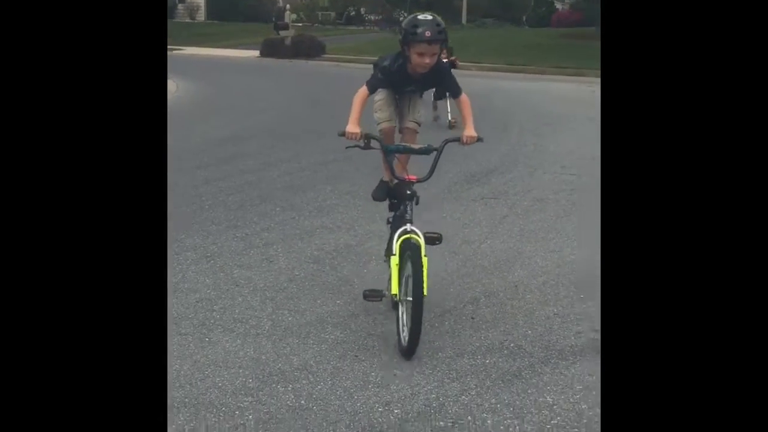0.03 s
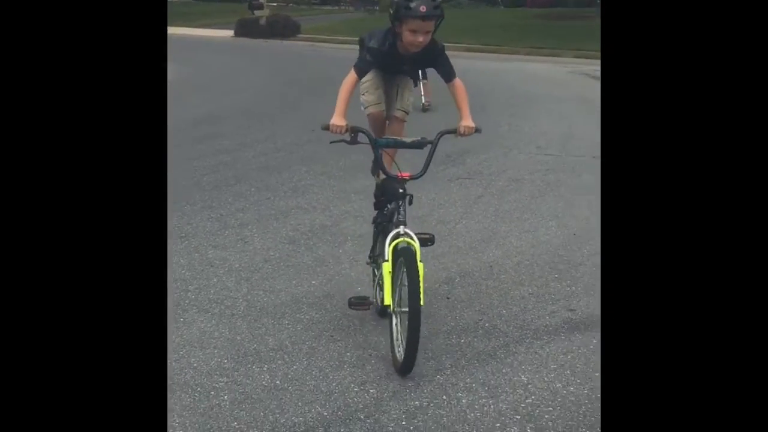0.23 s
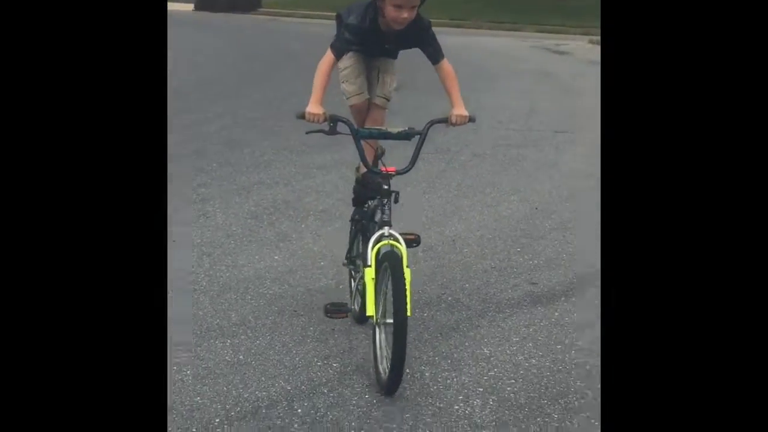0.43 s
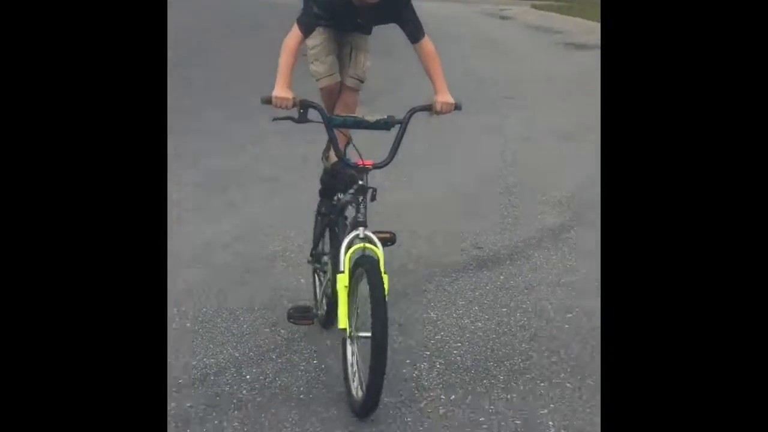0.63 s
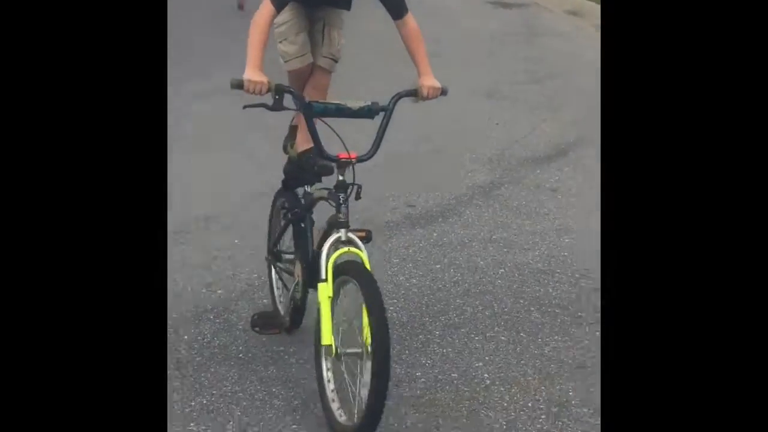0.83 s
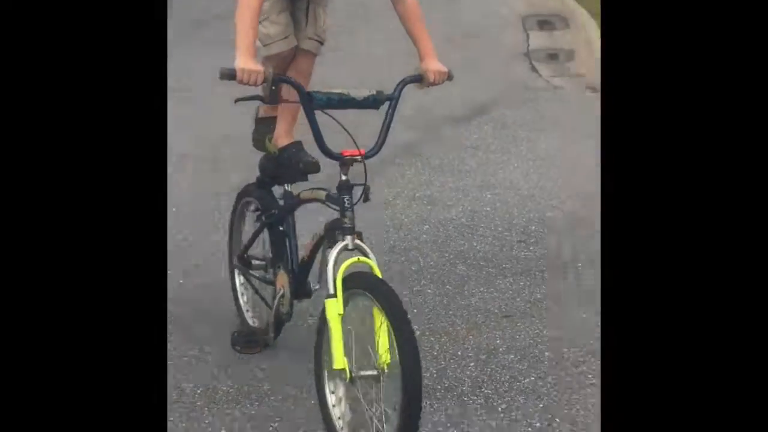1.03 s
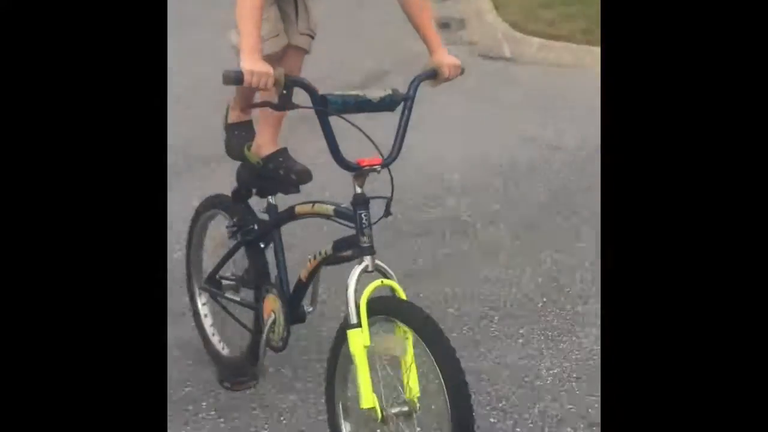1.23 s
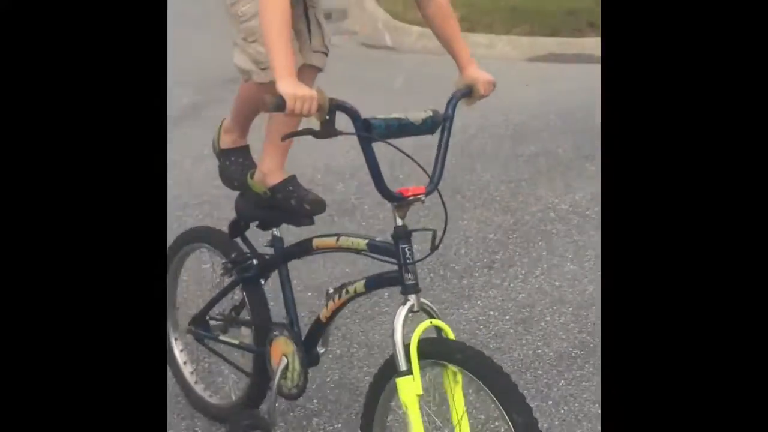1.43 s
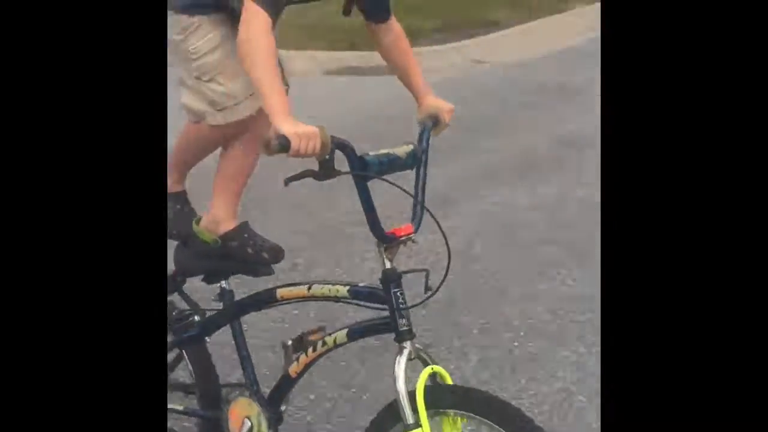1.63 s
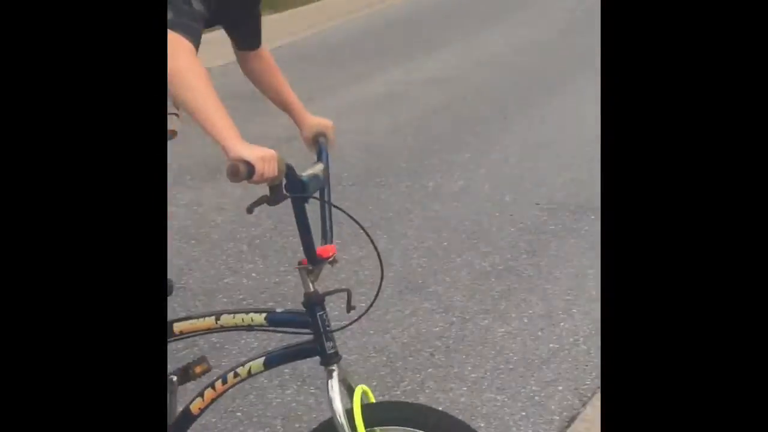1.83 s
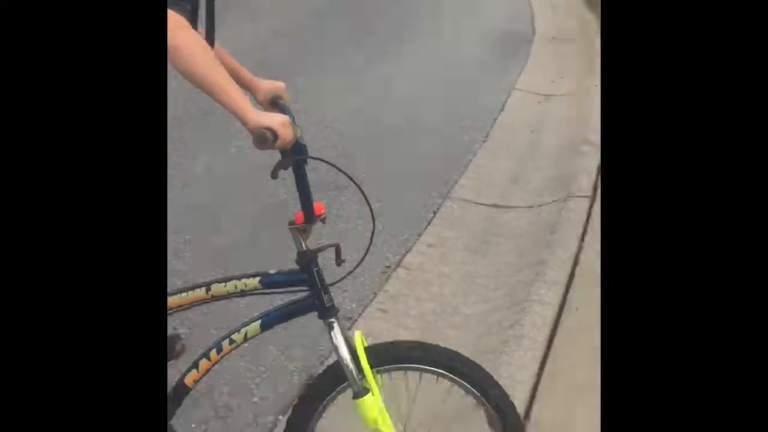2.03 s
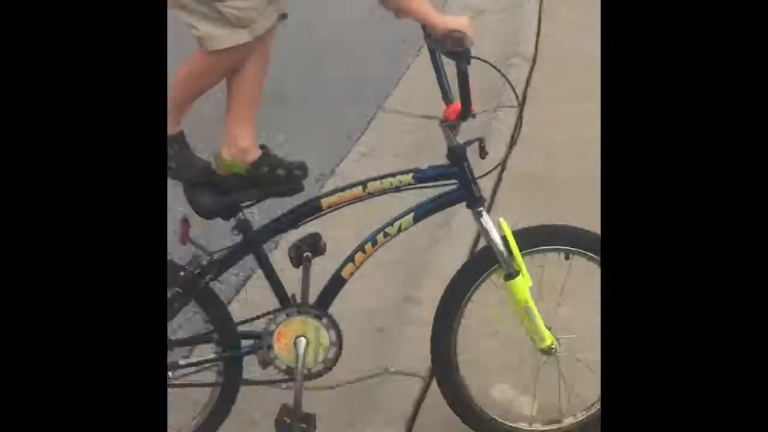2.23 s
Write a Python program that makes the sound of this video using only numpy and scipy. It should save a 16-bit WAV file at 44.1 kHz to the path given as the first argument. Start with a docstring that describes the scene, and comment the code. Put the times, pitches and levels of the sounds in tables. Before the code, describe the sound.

A small bicycle rolls up and passes close by outdoors. After a low gust of wind on the microphone come a faint thin squeak, bursts of chain clinking and one hollow knock, with tyres hissing and snapping small stones.

```python
"""Small bike coasting past

A small bike coasts toward and past the microphone on an asphalt street. The tyres hiss, drum,
scrunch on grit and snap stones aside; the slack chain and fittings rattle in bursts. Something
on the bike gives one thin squeak, later one hollow knock. Wind buffets the microphone over
a soft outdoor hush."""
import sys
import numpy as np
from scipy import signal
from scipy.fft import rfft, irfft, next_fast_len
from scipy.io import wavfile
from scipy.ndimage import uniform_filter1d

SR = 44100
rng = np.random.default_rng(int(sys.argv[2]) if len(sys.argv) > 2 else 0)


def dump_mix(stems):
    """Bounce the given channels to the path in sys.argv[1] as a 16-bit WAV at rate SR."""
    frames = np.atleast_2d(stems).T  # one column per channel
    limited = np.clip(frames, -1, 1)  # hard clip at full scale
    pcm = np.round(limited * 32767).astype(np.int16)
    wavfile.write(sys.argv[1], SR, pcm)


N = 101429
T = np.arange(N) / SR
CUTOFF_HZ = 15900

# tyres on asphalt: time_s, relative_db
ROLL_LEVEL = [(0,-59.5),(.23,-58.5),(.3,-65.5),(.68,-59),(.77,-57.5),(.95,-55.5),(1.11,-58),(1.23,-48),(1.32,-56.5),(1.5,-54.5),(1.62,-50.5),(1.70,-56),(1.80,-50.5),(1.87,-55),(2.01,-56),(2.07,-53),(2.16,-51),(2.3,-52.5)]
# tread spectrum: freq_hz, gain_db
ROLL_SPECTRUM = [(200,-7.5),(480,4),(700,8.5),(920,-8.5),(1350,0.5),(2800,-9.5),(4500,-11),(9000,-20),(10600,-21),(16000,-19.5)]
# patches of loose grit: peak_s, half_width_s, level_db
GRIT_SCRUNCHES = [(.235,0.015,-56.5),(.754,0.0092,-55),(.95,0.0036,-51.5),(1.165,0.014,-54),(.83,0.072,-64.5),(1.72,0.0093,-63),(1.756,0.014,-54),(1.813,0.0051,-54),(2.072,0.02,-48)]
# scrunch spectrum: freq_hz, gain_db
SCRUNCH_SPECTRUM = [(400,6),(1000,1.5),(2400,0),(3400,-7),(5000,-19),(9000,-26),(16000,-23)]

# chain and fitting contacts: start_s, treble_relative_db, body_relative_db, pitch_hz
CHAIN_CLINKS = [(0.902,-58,-62,6540),(1.035,-55.5,-54,8550),(1.166,-54.5,-64,8700),(1.1902,-53.5,-41,9000),(1.1993,-51,-44,6450),
                (1.203,-55,-47,8100),(1.2295,-53,-51,8950),(1.25,-58,-37,9100),(1.267,-46.5,-43,8500),(1.275,-60,-45.5,8500),
                (1.2827,-53,-46,9060),(1.4124,-52,-57,8700),(1.517,-60,-65,9000),(1.593,-53,-53,6200),(1.602,-53,-46.5,8200),
                (1.6738,-55.5,-52,8400),(1.681,-52,-48,8000),(1.687,-51,-45,11900),(1.715,-55,-44,5460),(1.744,-51,-61,9900),
                (1.7515,-46.5,-61,5980),(1.756,-46.5,-39.5,9200),(1.7622,-51,-50,9100),(1.9069,-46.5,-74,10400),(1.913,-53.5,-71,11140),
                (1.921,-54.5,-80,10500),(2.027,-52,-73,4930),(2.133,-44,-58,13700),(2.1388,-43.5,-57,10100),(2.1457,-51,-49,12400),
                (2.1986,-45,-45,4760),(2.2108,-45,-41,6430),(2.2176,-44,-40,10200),(2.226,-44.5,-55,4310),(2.232,-51,-50,9200),
                (2.2388,-40,-46,7100),(2.2659,-49,-58,5900)]
# bursts of small chain contacts: peak_s, half_width_s, relative_db
CHAIN_SHIVERS = [(.125,0.0075,-66),(.4,.008,-68),(.45,0.0083,-68),(.905,0.036,-64),(1.24,0.057,-62.5),(1.405,0.0089,-63.5),(1.68,0.038,-57),(1.757,0.018,-62),(1.92,0.031,-69),(2.12,0.093,-62.5),(2.232,.022,-58.5)]
# modes of the whole chain: freq_hz, width_hz, gain_db
CHAIN_RESONANCES = [(6400,350,-8),(8400,220,-6),(9100,170,-6),(13200,400,-8)]
# bright crack of a contact: freq_hz, gain_db
CRACK_SPECTRUM = [(1500,2),(4500,-2.5),(6500,-2),(9400,-1.5),(10500,-4.5),(12500,-1),(16000,0.5)]
# dull body of a contact: freq_hz, gain_db
BODY_SPECTRUM = [(500,-28),(1300,-2.5),(2400,7.5),(3300,2.5),(4500,-10),(6500,-14),(16000,-22)]

# stones snapping from under a tyre: start_s, relative_db, lowpass_hz
STONE_SNAPS = [(.888,-37,6000),(1.2592,-31,3000),(1.695,-32,6500),(1.7025,-41,11000),(1.8134,-28,4200),(2.2125,-23,3400)]
# snap spectrum: freq_hz, gain_db
SNAP_SPECTRUM = [(500,1),(1200,5),(2300,8),(4500,6),(8000,5),(16000,-1)]
# pebbles popping under the tread, plus one low tock at 1.599 s: start_s, relative_db, pitch_hz
PEBBLE_POPS = [(0.595,-51,2285),(0.755,-54,2380),(.949,-52.5,3580),(1.2294,-39.5,1370),(1.599,-53,630),(1.718,-41.5,1620),(1.955,-49,1860),(2.2125,-44,2160),(2.228,-43,4130),(2.24,-42,2030)]

# blows behind the knock: start_s, level_db
KNOCK_BLOWS = [(1.541,-37)]
# hollow modes: freq_hz, width_hz, gain_db
HOLLOW_MODES = [(1010,79,1),(1158,49,-1.5),(1350,100,-4),(1550,73,-6),(1920,130,-11)]
# squeak contour: time_s, pitch_hz, relative_db, warble_depth_hz
SQUEAK_CONTOUR = [(0.744,7050,-66,450),(.768,7330,-64.5,450),(0.786,8300,-60.5,80),(0.812,8300,-61,130),(.829,7470,-62,750),(0.836,6680,-60.5,80),(0.865,6770,-62.5,130),(0.876,5340,-60,200)]

# gusts on the microphone: time_s, relative_db
GUST_LEVEL = [(0.0,-43),(0.06,-53),(0.15,-35.5),(0.18,-44.5),(0.22,-32),(0.26,-40),(.35,-32),(0.49,-22.5),(0.67,-32),(0.7,-43),(0.86,-35.5),(0.91,-45.5),(0.94,-35.5),(0.98,-48.5),(1.29,-49.5),(1.32,-39),(1.36,-49.5),(1.53,-47.5),(1.6,-36.5),(1.66,-45),(1.72,-46.5),(1.8,-38),(1.86,-40.5),(1.94,-46.5),(2.02,-39),(2.05,-48.5),(2.18,-41.5),(2.24,-52),(2.28,-40.5)]
# short thumps of wind: peak_s, half_width_s, level_db
WIND_BUFFETS = [(1.571,0.011,-34.5),(1.62,0.0048,-22.5),(1.749,0.0057,-27),(1.82,0.008,-28)]
# eddy spectrum: freq_hz, gain_db
EDDY_SPECTRUM = [(20,-36),(30,-28),(40,-7),(65,1),(100,-3),(160,-11.5),(230,-27.5),(320,-46),(480,-72),(1000,-101)]
# finer eddies in the strongest gust: time_s, level_db
FLUTTER_LEVEL = [(.3,-67),(.44,-46),(.47,-31.5),(.55,-38),(.64,-40.5),(.72,-70),(.9,-100)]
# fine eddy spectrum: freq_hz, gain_db
FLUTTER_SPECTRUM = [(110,-10),(190,5),(270,-1.5),(350,-11.5),(430,-21),(600,-37.5),(1200,-91)]

# outdoor hush: time_s, level_db
HUSH_LEVEL = [(0,-53),(.06,-52.5),(.15,-56),(.24,-53.5),(.33,-52.5),(.7,-56.5),(1.0,-53),(1.15,-56.5),(2.3,-54.5)]
# hush spectrum: freq_hz, gain_db
HUSH_SPECTRUM = [(40,13.5),(100,1.5),(205,4.5),(300,5.5),(450,-13.5),(730,-2),(1300,-7),(2600,-22),(5000,-28.5),(9000,-29),(11000,-33),(16000,-38)]


def tyres():
    """Tread hiss and fine grit, small stones ringing at their own pitches, and short scrunches."""
    level_db, = curves(ROLL_LEVEL)
    hiss = from_db(-6.5) * rng.standard_normal(N)
    grit = from_db(-10.5) * grains(per_s=600, spread_db=8)
    roll = colour((hiss + grit) * from_db(level_db + 1.3 * drift(60)), ROLL_SPECTRUM)
    crunch, ring_cycles = 0, 11
    for hz in np.geomspace(620, 3200, num=36):
        ring = resonate(grains(per_s=30, spread_db=3.9), hz, hz / (np.pi * ring_cycles))
        crunch += rms_one(ring) * (hz / 1000) ** -.3
    scrunch = colour(grains(per_s=4000, spread_db=.46) * swells(GRIT_SCRUNCHES), SCRUNCH_SPECTRUM)
    return roll + from_db(level_db - 6.5) * rms_one(crunch) + scrunch


def drumming():
    """Rough asphalt makes the tyres drum, louder as they roll nearer."""
    pitch_hz, width_hz = 185.9, 60
    roll_db, = curves(ROLL_LEVEL)
    drum = resonate(rng.standard_normal(N), pitch_hz, width_hz)
    drum = rms_one(resonate(drum, pitch_hz, width_hz))
    return from_db(-53 + .54 * (roll_db - roll_db.mean())) * drum


def chain():
    """Slack chain and fittings clink: a crack, a dull body, a ring. Small contacts shiver between."""
    spread_octaves, link_width_hz = .4, 200
    partial_ratios = 2 ** (spread_octaves * rng.standard_normal((len(CHAIN_CLINKS), 4)))
    treble_noise, body_noise = rng.standard_normal((2, N))
    ticks = grains(per_s=330, spread_db=3) + from_db(-7) * rng.standard_normal(N)
    shiver = swells(CHAIN_SHIVERS) * rms_one(ticks)
    cracks, bodies, rings = from_db(.5) * shiver, from_db(-3) * shiver, 0
    for (start_s, treble_db, body_db, pitch_hz), ratios in zip(CHAIN_CLINKS, partial_ratios):
        envelope = strike(start_s, attack_s=.00092, decay_s=.0029)
        contact = from_db(treble_db) * envelope * treble_noise
        cracks += from_db(-2.5) * contact
        bodies += from_db(body_db - 5.5) * envelope * body_noise
        partials = sum(metal_ring(contact, pitch_hz * ratio, link_width_hz) for ratio in ratios) / 2
        rings += from_db(-7) * metal_ring(contact, pitch_hz, link_width_hz) + from_db(-9) * partials
    chain_ring = sum(from_db(db) * metal_ring(cracks, hz, width) for hz, width, db in CHAIN_RESONANCES)
    treble = colour(cracks + from_db(-10) * chain_ring, CRACK_SPECTRUM)
    return rings + treble + colour(bodies, BODY_SPECTRUM)


def metal_ring(contact, pitch_hz, width_hz):
    """Short metallic ring; keeps the power of the contact."""
    return resonate(contact, min(pitch_hz, CUTOFF_HZ), width_hz) * np.sqrt(SR / (np.pi * width_hz))


def stones():
    """Stones snap from under a tyre with a gritty tail; pebbles pop and ring briefly."""
    snaps, pops = np.zeros((2, N))
    for start_s, db, lowpass_hz in STONE_SNAPS:
        hit = from_db(db - 7) * strike(start_s, attack_s=.00019, decay_s=.001) * rng.standard_normal(N)
        hit[int(start_s * SR)] += from_db(db + 7)  # click ahead of the tail
        snaps += signal.sosfilt(signal.butter(2, lowpass_hz, fs=SR, output="sos"), hit)
    for start_s, db, pitch_hz in PEBBLE_POPS:
        envelope = from_db(db) * strike(start_s, attack_s=.0005, decay_s=.005)
        pops += envelope * np.sin(2 * np.pi * pitch_hz * (T - start_s))
    return colour(snaps, SNAP_SPECTRUM) + pops * (.89 + .35 * drift(380))


def knock():
    """A blow rings a few short, hollow modes."""
    out = np.zeros(N)
    for start_s, level_db in KNOCK_BLOWS:
        age_s = np.maximum(T - start_s, 0)
        for k, (hz, width_hz, gain_db) in enumerate(HOLLOW_MODES):
            decay = np.exp(-np.minimum(np.pi * width_hz * age_s, 20))
            out += (-1) ** k * from_db(level_db + gain_db) * np.sin(2 * np.pi * hz * age_s) * decay
    return out


def squeak():
    """Thin rubbing tone that arches in pitch and warbles as it slides."""
    warble_hz, jitter_hz, rasp_db, fade_s = 107.3, 130, 2.6, .0019
    pitch_hz, level_db, depth_hz = curves(SQUEAK_CONTOUR)
    start_s, end_s = SQUEAK_CONTOUR[0][0], SQUEAK_CONTOUR[-1][0]
    warble = np.sin(2 * np.pi * np.cumsum(warble_hz * (1 + .11 * drift(39.4))) / SR)
    gate = np.clip(np.minimum(T - start_s, end_s - T) / fade_s, 0, 1)
    envelope = gate * from_db(level_db + 2.5 + rasp_db * drift(300))
    freq_hz = pitch_hz + depth_hz * warble + jitter_hz * drift(980)
    return envelope * np.sin(2 * np.pi * np.cumsum(freq_hz) / SR)


def wind():
    """Eddies at the microphone follow gusts and buffets; the strongest gust flutters higher."""
    gust_db, = curves(GUST_LEVEL)
    flutter_db, = curves(FLUTTER_LEVEL)
    eddies = colour(rng.standard_normal(N), EDDY_SPECTRUM)
    local_power = uniform_filter1d(np.abs(signal.hilbert(eddies)) ** 2, size=1100) / 2
    eddies /= np.sqrt(local_power + 1e-9)
    flutter = from_db(flutter_db) * colour(rng.standard_normal(N), FLUTTER_SPECTRUM)
    return (from_db(gust_db + 1) + swells(WIND_BUFFETS)) * eddies + flutter


def street():
    """Outdoor hush, gently swelling."""
    level_db, = curves(HUSH_LEVEL)
    return from_db(level_db + .5 * drift(24)) * colour(rng.standard_normal(N), HUSH_SPECTRUM)


def from_db(db):
    """Decibels to gain."""
    return 10 ** (np.asarray(db) / 20)


def rms_one(x):
    """Scale to unit rms."""
    return x / np.sqrt(np.mean(x ** 2) + 1e-20)


def curves(rows):
    """Interpolate each column linearly over time."""
    time_s, *columns = np.transpose(rows)
    return [np.interp(T, time_s, column) for column in columns]


def drift(rate_hz):
    """Low-passed random wander, rms 1."""
    freq_hz = np.arange(N // 2 + 1) * SR / N
    return rms_one(irfft(rfft(rng.standard_normal(N)) / (1 + (freq_hz / rate_hz) ** 2), N))


def colour(x, spectrum):
    """Minimum-phase filter with the given spectrum; keeps the power of white noise."""
    size = next_fast_len(N + SR // 2, real=True) // 2 * 2
    bins_hz = np.maximum(np.arange(size // 2 + 1) * SR / size, 1)
    hz, db = np.transpose(spectrum)
    gain = from_db(np.interp(np.log(bins_hz), np.log(hz), db))
    low_cut = 1 / (1 + (hz[0] / 2 / bins_hz) ** 2)
    cepstrum = irfft(np.log(rms_one(gain * low_cut)), size)
    cepstrum[1:size // 2] *= 2
    cepstrum[size // 2 + 1:] = 0
    return irfft(rfft(x, size) * np.exp(rfft(cepstrum)), size)[:N]


def resonate(x, freq_hz, width_hz):
    """Two-pole resonance, peak gain 1."""
    radius = np.exp(-np.pi * width_hz / SR)
    feedforward = np.array([1, 0, -1]) * (1 - radius ** 2) / 2
    feedback = [1, -2 * radius * np.cos(2 * np.pi * freq_hz / SR), radius ** 2]
    return signal.lfilter(feedforward, feedback, x + 1e-18)


def grains(per_s, spread_db):
    """Random clicks of uneven size, rms 1."""
    sizes = from_db(spread_db * np.minimum(rng.exponential(1, N), 3)) * rng.choice([-1, 1], N)
    return rms_one(sizes * (rng.random(N) < per_s / SR))


def swells(rows):
    """Sum of bell-shaped envelopes."""
    return sum(from_db(db) * np.exp(-.5 * ((T - peak_s) / width_s) ** 2) for peak_s, width_s, db in rows)


def strike(start_s, attack_s, decay_s):
    """Contact envelope: linear rise, exponential decay."""
    age_s = np.maximum(T - start_s, 0)
    return np.minimum(age_s / attack_s, 1) * np.exp(-np.clip((age_s - attack_s) / decay_s, 0, 20))


def scene():
    """Wind, street and the passing bike, mono."""
    return (wind() + street() + tyres() + drumming() + chain() + stones() + knock() + squeak())[None]


def record(dry):
    """Steep low-pass."""
    return signal.sosfilt(signal.ellip(12, .2, 80, CUTOFF_HZ, fs=SR, output="sos"), dry)


dry = scene()
out = record(dry)
dump_mix(out)
```